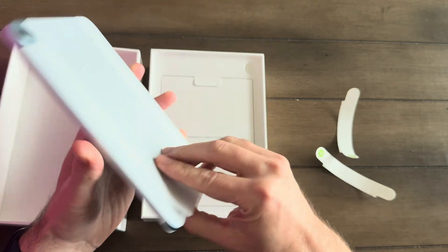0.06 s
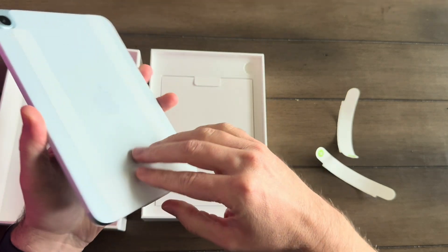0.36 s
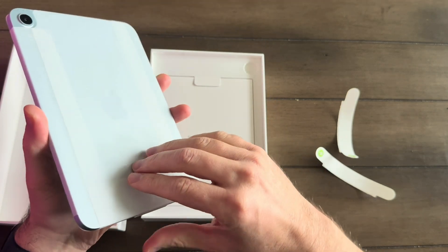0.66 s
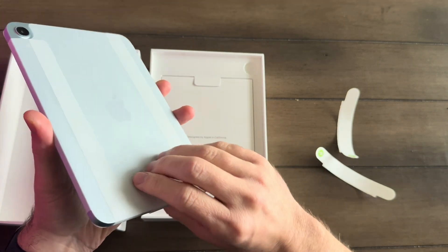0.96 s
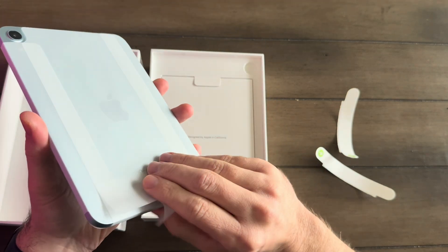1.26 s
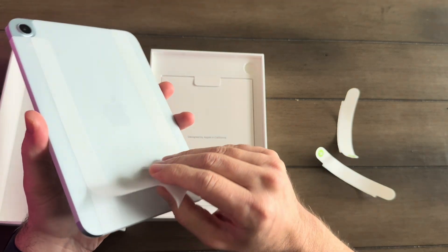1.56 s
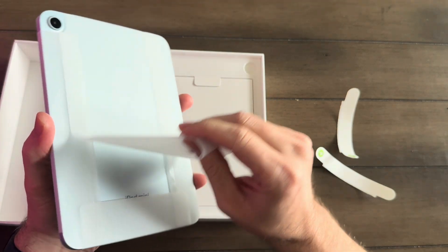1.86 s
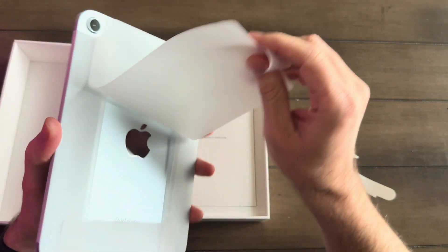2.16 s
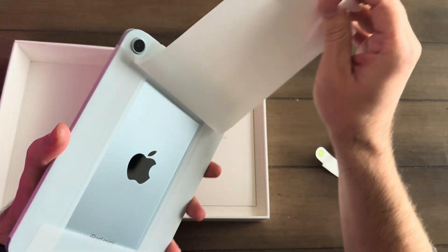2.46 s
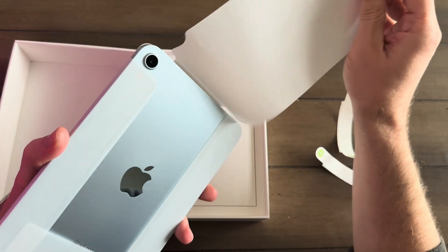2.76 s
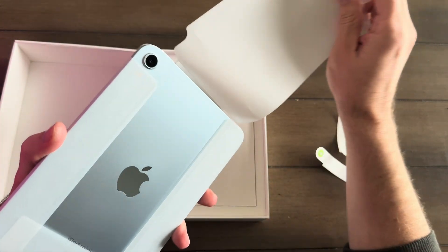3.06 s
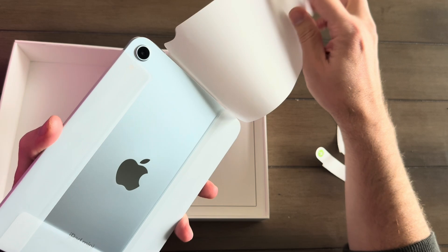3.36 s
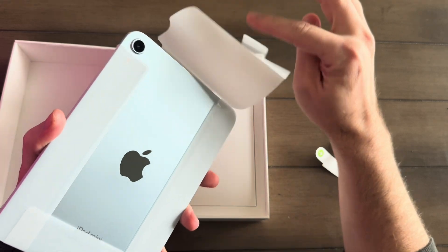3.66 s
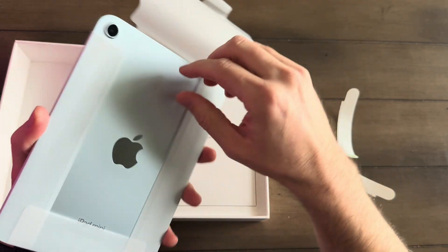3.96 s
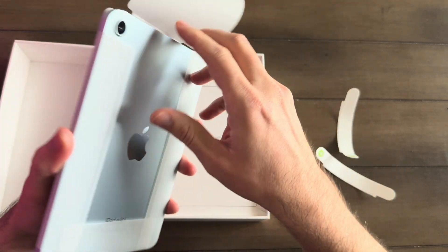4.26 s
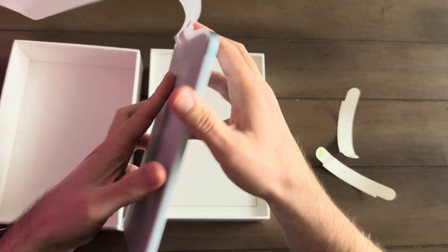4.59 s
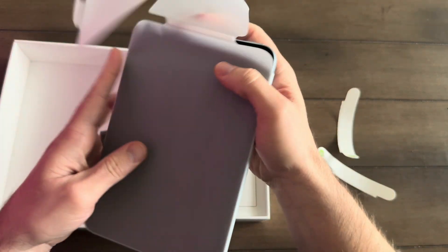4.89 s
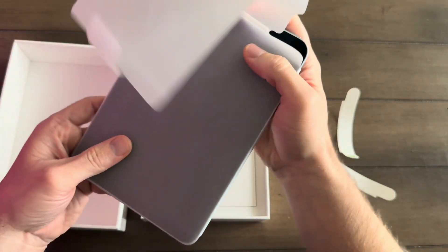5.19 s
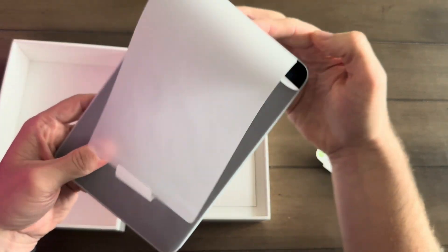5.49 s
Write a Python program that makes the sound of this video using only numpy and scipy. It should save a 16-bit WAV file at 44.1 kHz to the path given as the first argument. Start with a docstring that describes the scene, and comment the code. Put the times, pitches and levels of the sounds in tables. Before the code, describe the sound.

Close up in a small quiet room, a tablet is handled with a soft brush and a light, briefly ringing tap at about 0.2 seconds. Around 1 second fingertips hiss over its stiff paper wrap. From 1.6 to 2.7 seconds the glued seam peels open, crackling and letting go in sharp snaps, the strongest near 1.7, 2.4 and 2.7 seconds. The sheet crinkles and shivers, with soft low booms of pushed air underneath. From 3 to 4.5 seconds it is quieter, as the freed paper flexes with faint rustles and small ticks. A sliding hiss swells into a loud, sharp double snap at about 4.75 seconds as the sheet flicks round the edge. It then wobbles hollowly and brushes over the tablet, with light knocks and a smaller snap near 5.3 seconds. Faint room tone lies under everything.

```python
"""A small quiet room, close up: two hands peel a stiff paper wrap off a tablet.
Fingertips hiss over the paper, then the glued seam crackles thread by thread and lets go in sharp
snaps, each a run of micro-cracks that sets the sheet shivering. The freed sheet flexes, wobbles
and fans the air; at the end it flicks round the edge and brushes over the front.
Knocks and soft low booms from the tablet, the paper and pushed air sit over faint room tone."""
import sys
import numpy as np
from scipy import signal
from scipy.fft import rfft, irfft
from scipy.io import wavfile
from scipy.ndimage import uniform_filter1d

SR = 44100
rng = np.random.default_rng(int(sys.argv[2]) if len(sys.argv) > 2 else 0)


def generate_wav(signal):
    """Clip the signal to [-1, 1] and save it as 16-bit WAV at the path in sys.argv[1]."""
    frames = np.transpose(np.atleast_2d(signal))
    scaled = np.clip(frames, -1, 1) * 32767
    pcm = np.round(scaled).astype(np.int16)
    wavfile.write(sys.argv[1], SR, pcm)


N = 248360
TIME = np.arange(N) / SR
CONTROL_TIME = TIME[::64]

# room tone and hiss (frequency [Hz], level [dB])
ROOM_TONE_EQ = [(18, -29), (30, -1.5), (62, -10), (106, -7), (194, -27.5), (300, -20), (400, -23.5),
                (632, -29), (1190, -33.5), (1910, -32.5), (2300, -34.5), (4500, -35.5), (6300, -41),
                (9800, -31.5), (14000, -42), (16000, -54.5)]
# narrow whine in the room tone (frequency [Hz], width [Hz], boost [dB])
ROOM_WHINE = (1860, 160, 6)
# reverb decay (frequency [Hz], t60 [s])
ROOM_DECAY = [(150, 0.58), (1500, 0.46), (5000, 0.24), (10000, 0.19), (16000, 0.24)]
# colours of fanned air, fingertips on paper, sliding paper, the ringing sheet and a crack,
# each (frequency [Hz], level [dB])
AIR_EQ = [(10, -0.5), (40, -0.5), (110, 0.5), (200, -8.5), (300, -11.5), (450, -44.5), (1000, -46),
          (3000, -85.5)]
FINGERTIP_EQ = [(300, -9.5), (1200, -28.5), (2600, -18.5), (4000, -8), (5000, -4), (6500, -5), (7800, -2),
                (9800, 1), (12000, -7), (15000, -12), (16500, -27)]
SLIDE_EQ = [(300, -6.5), (1200, -14), (2600, -13), (4000, -10), (5000, -5.5), (6800, -8), (8000, -1.5),
            (9800, 2), (12000, -5.5), (15000, -4.5), (16500, -41)]
SHEET_EQ = [(150, -17), (350, -11), (480, -3), (670, -2), (1100, -8), (1500, -4), (1780, 0), (2130, -12.5),
            (2520, -6), (3000, -12.5), (3550, -9.5), (5000, -17), (9000, -24.5), (16000, -51.5)]
CRACK_EQ = [(150, -1), (350, -8), (700, -8), (950, -15.5), (1700, 0.5), (2200, -15), (2600, -0.5),
            (3200, -5.5), (4400, -1), (6000, -2), (9500, 2), (11500, -5), (15000, -13.5), (16500, -29.5)]
# the tablet or the sheet swings round (time [s], rise [s], length [s], level [dB])
AIR_SWINGS = [(-.03, 0.028, .19, -53), (2.64, .06, .14, -45), (4.4, 0.09, .12, -54)]
# the first lifted flap flutters (time [s], rise [s], length [s], level [dB])
FLAP_LIFT = (1.665, 0.46, 0.2419, -43)
# soft low booms of tablet, flap and pushed air (time [s], level [dB], pitch [Hz], rise [s])
LOW_BOOMS = [(.01, -53.5, 98.1, 0.052), (0.187, -40, 47, 0.01), (0.646, -50.5, 103, 0.051),
             (1.342, -50.5, 109, 0.0063), (1.662, -32, 222, 0.0043), (1.701, -32.5, 170, 0.0037),
             (1.727, -29, 179, 0.0026), (1.761, -38.5, 91.8, 0.021), (1.84, -31.5, 68, 0.0066),
             (2.644, -38.5, 95.6, 0.019), (4.101, -50, 119, 0.0042), (5.155, -53, 105, 0.035),
             (5.262, -53, 63.5, 0.024), (5.58, -53, 101, 0.027)]
# ring of the tablet's edge (frequency [Hz], level [dB], t60 [s])
EDGE_PARTIALS = [(3220, -47.5, .12), (3460, -60.5, 0.1), (5210, -45, 0.04), (9000, -66, .15)]
# the sheet buckles, the tablet knocks (time [s], level [dB], pitch [Hz], decay [s], width [ratio])
HANDLING_KNOCKS = [(.1878, -39.5, 4500, .0029, .28), (.1973, -38, 3570, 0.0053, 0.44),
                   (.197, -28, 8870, 0.0019, 0.16), (.198, -49, 154, 0.016, 0.66),
                   (1.344, -65, 400, 0.0059, 0.51), (1.491, -57.5, 300, 0.0032, 0.43),
                   (1.848, -49, 330, 0.0066, 0.82), (2.569, -38, 745, 0.0036, 0.18),
                   (2.856, -59, 1540, .006, .55), (3.318, -60.5, 228, 0.015, 0.39),
                   (3.64, -67, 228, 0.011, 0.33), (3.759, -57, 1290, 0.0035, 0.79),
                   (4.756, -36.5, 4260, .0028, 0.068), (4.964, -49, 1360, 0.0035, 0.26),
                   (4.965, -49, 520, 0.0025, .42), (5.265, -44, 590, 0.0055, 0.26)]
# the loose sheet wobbles (time [s], level [dB], decay [s])
SHEET_WOBBLES = [(4.774, -48.5, 0.022), (4.83, -55, 0.0066), (4.849, -49.5, .005), (5.111, -58.5, .035)]
# strokes of skin and paper (time [s], rise [s], length [s], level [dB], brightness [dB/octave])
PAPER_STROKES = [(0.079, 0.083, 0.18, -60.5, -1), (0.732, 0.05, 0.14, -76, -6),
                 (0.999, 0.036, 0.075, -50.5, 0.5), (1.074, 0.038, 0.12, -54.5, -2),
                 (1.16, 0.017, 0.042, -55, -4.5), (1.232, 0.076, 0.089, -63, 4),
                 (1.433, 0.089, 0.056, -66.5, -2), (1.583, 0.034, 0.21, -64, -2),
                 (2.296, .05, .06, -60.5, -2), (2.908, 0.12, 0.12, -72, -3.5),
                 (3.124, 0.038, 0.076, -66.5, -6), (3.21, 0.076, 0.061, -62.5, -9),
                 (3.539, .03, 0.094, -69, -9), (3.781, 0.045, 0.043, -64, -4),
                 (4.127, 0.02, 0.18, -66.5, -6.5), (4.37, 0.081, .19, -62.5, -3.5),
                 (4.533, 0.15, 0.097, -55, -2), (4.696, 0.023, .15, -58, -6),
                 (4.856, 0.068, 0.16, -57.5, 3), (5.084, 0.057, 0.048, -62, -3),
                 (5.212, 0.027, 0.044, -51.5, -4), (5.332, 0.039, 0.038, -64, -8.5),
                 (5.44, .03, 0.031, -67.5, 0), (5.588, 0.016, 0.011, -54.5, -6)]
# bends of the sheet (peak time [s], settling time [s], level [dB], brightness [dB/octave])
SHEET_BENDS = [(.005, 0.026, -62, 6), (1.53, .11, -70, 4), (1.635, 0.038, -71.5, -0.5),
               (1.69, 0.092, -57.5, 0), (1.775, 0.029, -54.5, -1), (1.932, 0.033, -52, -2.5),
               (2.135, .025, -55, -2), (2.253, .022, -47, -2), (2.464, 0.018, -40.5, 2),
               (2.531, 0.021, -40.5, 0.5), (2.585, 0.027, -44, 1), (2.772, 0.019, -45, 2.5),
               (3, 0.3, -78.5, 3), (3.16, 0.068, -69, -1.5), (3.315, 0.038, -66, -1),
               (3.539, 0.012, -58.5, 0.5), (3.61, 0.026, -68.5, 0), (3.78, 0.025, -67, 1.5),
               (4.225, .06, -56, 3.5), (4.5, 0.42, -74, 2), (4.783, 0.03, -50.5, 1),
               (4.99, 0.071, -73.5, 3), (5.134, 0.021, -61, -0.5), (5.28, 0.062, -63, -1),
               (5.48, 0.062, -67.5, 2)]
# pull on the seam, heard as glue crackle (time [s], level [dB], brightness [dB/octave])
SEAM_PULL = [(1.62, -82, -1.5), (1.67, -61.5, 22), (1.85, -62, -2), (2.051, -65, 1.5), (2.13, -62.5, -9.5),
             (2.3, -67, -4.5), (2.57, -69, 1), (2.68, -87.5, 6.5)]
# paper snaps (time [s], length [s], crack level [dB], brightness [dB/octave], shiver level [dB])
PAPER_SNAPS = [(0.12, 0.013, -58, 1.5, -72), (1.393, .004, -61, 0, -60), (1.4278, .0036, -59, 12, -76),
               (1.477, 0.00093, -52, 10, -69), (1.535, 0.0019, -46.5, -0.5, -54),
               (1.66, 0.004, -31, 2.5, -33.5), (1.7023, 0.0026, -39.5, -8, -57),
               (1.7274, 0.0036, -40, 2, -45), (1.771, 0.0053, -49, -3, -52), (1.8465, .0045, -43, 0, -54),
               (2.1205, 0.0071, -47, 4, -45), (2.1555, .004, -42, 2.5, -57), (2.179, .008, -52, -5.5, -62),
               (2.2302, .006, -45.5, 2, -52), (2.285, 0.016, -54.5, 1.5, -68),
               (2.4389, 0.0049, -25, 1, -29.5), (2.5162, .0035, -40.5, -3, -51),
               (2.528, 0.0057, -39, -6, -46), (2.568, 0.0073, -42, 0, -59), (2.6325, 0.003, -37.5, -3, -55),
               (2.6928, 0.0023, -26.5, -3, -34), (3.365, 0.0075, -63.5, 0, -84),
               (3.408, 0.0035, -61.5, 20, -72), (3.5207, 0.0037, -52, -6, -55), (3.739, .0065, -57, 5, -74),
               (3.7567, 0.0027, -49.5, -3, -57), (4.0925, 0.0078, -58.5, 6, -59.5),
               (4.389, 0.0047, -56.5, -1, -62), (4.7384, .00047, -19.5, 8, -51),
               (4.7397, .0018, -27, 6, -63), (4.756, 0.0039, -27, 1.5, -60), (5.217, .0055, -53, -2, -75),
               (5.2644, 0.0071, -40, -3, -45), (5.475, 0.0062, -57.5, -4, -72)]


def amp(db):
    """Decibels to gain."""
    return 10 ** (np.asarray(db) / 20)


def unit_rms(x):
    """Scales to rms 1."""
    return x / np.sqrt(np.mean(x ** 2) + 1e-20)


def value_at(points, hz):
    """Reads a curve on a log-frequency axis."""
    point_hz, value = np.transpose(points)
    return np.interp(np.log(hz + 1), np.log(point_hz + 1), value)


def add(mix, start, sound):
    """Mixes a sound in at a start time in seconds."""
    part = mix[max(round(start * SR), 0):][:len(sound)]
    part += sound[:len(part)]


def tilted(eq, hz, tilt, low_hz, high_hz):
    """Gains of an EQ tilted in dB/octave across a band, normalised by its power in that band."""
    gain = amp(value_at(eq, hz) + tilt * np.log2(np.clip(hz, low_hz, high_hz) / low_hz))
    inside = (hz >= low_hz) & (hz <= high_hz)
    return gain / np.sqrt(np.mean(gain ** 2 * inside, axis=-1, keepdims=True))


def resonate(drive, gain):
    """Colours a hit with a minimum-phase filter, which keeps its attack sharp."""
    log_gain = np.log(np.maximum(np.r_[gain, gain[-2:0:-1]], 1e-5))
    impulse = np.fft.ifft(np.exp(np.conj(signal.hilbert(log_gain)))).real[:1024]
    return signal.fftconvolve(drive, impulse)


def grains(per_s, spread_db, smooth, length_s):
    """Tiny scratches of uneven size over a bed of smooth friction noise."""
    size = amp(spread_db * np.minimum(rng.exponential(1, N), 4))
    hits = rng.random(N) < per_s / SR
    power = signal.lfilter([1], [1, -np.exp(-1 / (length_s * SR))], size ** 2 * hits)
    return unit_rms(np.sqrt(power / power.mean() + smooth ** 2) * rng.standard_normal(N))


def micro_cracks(envelope):
    """A run of micro-cracks under an envelope, with chance resonances of its own."""
    spectrum = rfft(rng.standard_normal(len(envelope)) * envelope)
    spectrum /= np.sqrt(abs(spectrum) + 1e-9)  # many cracks fill in the deepest notches
    run = irfft(spectrum, len(envelope)) * envelope ** .2
    return run / np.linalg.norm(run)


def flutter(rate_hz):
    """Smooth random modulation of rms 1."""
    hz = np.fft.rfftfreq(N, 1 / SR)
    return unit_rms(irfft(rfft(rng.standard_normal(N)) / (1 + (hz / rate_hz) ** 2), N))


def moving_eq(drive, curve, eq, low_hz, high_hz, drift_db=0, size=512):
    """Rides level and brightness along a curve; resonances drift by drift_db as the paper bends."""
    times, level_db, tilt = np.transpose(curve)
    frames = dict(nperseg=size, noverlap=size - size // 4)
    hz, t, spectra = signal.stft(drive, SR, **frames)
    gain = tilted(eq, hz, np.interp(t, times, tilt)[:, None], low_hz, high_hz)
    drift = uniform_filter1d(rng.standard_normal(gain.shape), size=9, axis=0)
    drift = unit_rms(uniform_filter1d(drift, size=5, axis=1))
    gain *= unit_rms(amp(drift_db * drift))
    sound = signal.istft(spectra * gain.T, SR, **frames)[1][:N]
    return sound * amp(np.interp(TIME, times, level_db))


def stroke(start, rise, length, release_s=0.03):
    """Envelope of a move that gathers speed, holds it and lets go."""
    t = CONTROL_TIME - start
    return np.clip(t / rise, 0, 1) * np.exp(-np.maximum(t - length, 0) / release_s)


def bend(peak_time, settle, rise_ratio=1.01):
    """Envelope of the sheet bending smoothly, then settling."""
    t = (CONTROL_TIME - peak_time) / settle
    return np.exp(np.where(t < 0, -(t / rise_ratio) ** 2, -t))


def pull(offset_db, tilt):
    """A move (gain, brightness) that follows the pull on the seam."""
    times, level_db, _ = np.transpose(SEAM_PULL)
    pulling = (CONTROL_TIME > times[0]) & (CONTROL_TIME < times[-1])
    return amp(np.interp(CONTROL_TIME, times, level_db) + offset_db) * pulling, tilt


def rubs(offset_db=0):
    """Every paper stroke as a move (gain, brightness)."""
    return [(amp(db + offset_db) * stroke(start, rise, length), tilt)
            for start, rise, length, db, tilt in PAPER_STROKES]


def blend(moves):
    """Sums moves by power into a curve (time [s], level [dB], brightness [dB/octave])."""
    power = sum(gain ** 2 for gain, _ in moves) + 1e-14
    brightness = sum(gain ** 2 * tilt for gain, tilt in moves) / power
    return np.c_[CONTROL_TIME, 10 * np.log10(power), brightness]


def room_tone(level_db=-68):
    """A steady bed of room noise and hiss with a faint whine."""
    hz = np.fft.rfftfreq(N, 1 / SR)
    whine_hz, width_hz, boost_db = ROOM_WHINE
    eq_db = value_at(ROOM_TONE_EQ, hz) + boost_db * np.exp(-(2 * (hz - whine_hz) / width_hz) ** 2)
    return amp(level_db) * unit_rms(irfft(rfft(rng.standard_normal(N)) * amp(eq_db), N))


def room_reverb(send, predelay_s=0.0027, build_s=0.0089, echoes_per_s=6000):
    """Scattered reflections build up quickly and die band by band."""
    t = TIME[:SR // 2]
    echoes = rng.standard_normal(len(t)) * (rng.random(len(t)) < echoes_per_s / SR)
    echoes *= np.clip((t - predelay_s) / build_s, 0, 1)
    hz, age, spectra = signal.stft(echoes, SR, nperseg=256)
    decay = amp(-60 * age / value_at(ROOM_DECAY, hz)[:, None])
    tail = signal.istft(spectra * decay, SR, nperseg=256)[1]
    return signal.fftconvolve(send, tail / np.linalg.norm(tail))[:N]


def fanned_air(trim_db=-1, bend_db=-0.5, linger=3.4, bend_tilt=-3, swing_tilt=-6):
    """The moving sheet, tablet and hands push low waves of air."""
    bends = [(amp(db + bend_db) * bend(peak, settle * linger), bend_tilt)
             for peak, settle, db, _ in SHEET_BENDS]
    swings = [(amp(db) * stroke(start, rise, length), swing_tilt)
              for start, rise, length, db in AIR_SWINGS]
    start, rise, length, db = FLAP_LIFT
    flap_tilt = 12 - 72 * (CONTROL_TIME - start)  # the flap sounds lower as it grows longer
    flap = amp(db) * stroke(start, rise, length), flap_tilt
    restless_hands = amp(-69), 2
    curve = blend(bends + swings + [flap, pull(offset_db=18.5, tilt=-3), restless_hands])
    return amp(trim_db) * moving_eq(rng.standard_normal(N), curve, AIR_EQ, 8.6, 400, size=2048)


def low_booms():
    """Soft low booms swell and die: the held tablet, the lifting flap and pushed air."""
    out, t = np.zeros(N), TIME[:SR // 2]
    for start, db, hz, rise in LOW_BOOMS:
        swell = (t / rise * np.exp(1 - t / rise)) ** 2
        add(out, start, amp(db) * np.sqrt(2) * swell * np.sin(2 * np.pi * hz * t))
    return out


def edge_ring(tap_s=.197):
    """The tablet's edge rings briefly as it is turned over in the hand."""
    t = np.maximum(TIME - tap_s, 0)
    return sum(amp(db - 60 * t / t60) * np.sin(2 * np.pi * hz * t) for hz, db, t60 in EDGE_PARTIALS)


def knocks_and_wobbles(wobble_hz=1680, wobble_width=0.13):
    """Short bursts ring one resonance each; the loose sheet always wobbles on the same hollow note."""
    out, t = np.zeros(N), TIME[:8192]
    hz = np.fft.rfftfreq(len(t), 1 / SR)
    wobbles = [(start, db, wobble_hz, decay, wobble_width) for start, db, decay in SHEET_WOBBLES]
    for start, db, pitch_hz, decay, width in HANDLING_KNOCKS + wobbles:
        resonance = 1 / (1 + (np.log((hz + 1) / pitch_hz) / width) ** 2)
        pop = resonate(micro_cracks(np.exp(-t / decay)), resonance)
        add(out, start, amp(db) * pop * np.sqrt(decay * SR / np.sum(pop ** 2)))
    return out


def sliding_hiss(trim_db=-0.5, flutter_db=2.25, fingertips_end_s=1.37):
    """Fine friction: first fingertips over the paper, then paper over skin and metal."""
    curve = blend(rubs() + [pull(offset_db=-3.5, tilt=-1.5)])
    friction = grains(per_s=6600, spread_db=3.0, smooth=3.4, length_s=0.00028)
    friction *= amp(flutter_db * flutter(rate_hz=28))
    stroking = TIME < fingertips_end_s
    fingertips = moving_eq(friction * stroking, curve, FINGERTIP_EQ, 4200, 16000, drift_db=2)
    paper = moving_eq(friction * ~stroking, curve, SLIDE_EQ, 4600, 16000, drift_db=2)
    return amp(trim_db) * (fingertips + paper)


def sheet_crinkle(trim_db=-1, flutter_db=3.0, stroke_tilt=3):
    """Clumps of small crinkles ring the sheet as it is bent, stroked or pulled."""
    bends = [(amp(db) * bend(peak, settle), tilt) for peak, settle, db, tilt in SHEET_BENDS]
    strokes = [(gain, stroke_tilt) for gain, _ in rubs(offset_db=-21)]
    curve = blend(bends + strokes + [pull(offset_db=-2.5, tilt=-4)])
    crinkles = grains(per_s=1100, spread_db=-2.0, smooth=1.0, length_s=0.00046)
    crinkles *= amp(flutter_db * flutter(rate_hz=81))
    return amp(trim_db) * moving_eq(crinkles, curve, SHEET_EQ, 500, 6100, drift_db=3)


def glue_crackle():
    """Threads of glue part one after another for as long as the seam is pulled."""
    threads = grains(per_s=150, spread_db=3.0, smooth=0.194, length_s=.0013)
    pulling = (TIME > SEAM_PULL[0][0]) & (TIME < SEAM_PULL[-1][0])
    return moving_eq(threads * pulling, SEAM_PULL, CRACK_EQ, 2000, 12000, drift_db=3)


def paper_snaps(fade_s=.001, shiver_rise_s=0.00081, shiver_s=0.0074, puff_hz=150, puff_s=0.0024):
    """Each snap is a quick run of micro-cracks; the sheet shivers after it and pushes a puff of air."""
    cracks, body = np.zeros(N), np.zeros(N)
    t, hz = TIME[:6000], np.fft.rfftfreq(2048, 1 / SR)
    for start, length, crack_db, tilt, shiver_db in PAPER_SNAPS:
        envelope = np.exp(-t / (2 * length) - np.maximum(t - length, 0) / fade_s)
        crack = resonate(micro_cracks(envelope), tilted(CRACK_EQ, hz, tilt, 1300, 12000))
        add(cracks, start, amp(crack_db) * crack * np.sqrt(length * SR / np.sum(crack ** 2)))
        shiver = rng.standard_normal(len(t)) * (1 - np.exp(-t / shiver_rise_s)) * np.exp(-t / shiver_s)
        add(body, start, amp(shiver_db) * resonate(shiver, tilted(SHEET_EQ, hz, 1.1, 570, 9700)))
        puff_db = min(shiver_db + 16.5, -30)  # capped at the most air the sheet can push
        add(body, start, amp(puff_db) * np.sin(2 * np.pi * puff_hz * t) * np.exp(-t / puff_s))
    return cracks, body


def scene(crack_send_db=-11, rustle_send_db=-14, knock_send_db=-15):
    """Mono mix: cracks, rustle and knocks feed the reverb; air, booms and room tone stay dry."""
    cracks, snap_body = paper_snaps()
    knocks = knocks_and_wobbles()
    rustle = snap_body + sliding_hiss() + sheet_crinkle() + glue_crackle() + edge_ring()
    send = amp(crack_send_db) * cracks + amp(rustle_send_db) * rustle + amp(knock_send_db) * knocks
    return (cracks + knocks + rustle + room_reverb(send) + fanned_air() + low_booms() + room_tone())[None]


def record(dry, cutoff_hz=16300):
    """A steep low-pass trims the very top of the mix."""
    lowpass = signal.firwin(511, cutoff_hz, window=("kaiser", 9), fs=SR)
    return signal.oaconvolve(dry, lowpass[None], "same")


dry = scene()
out = record(dry)
generate_wav(out)
```